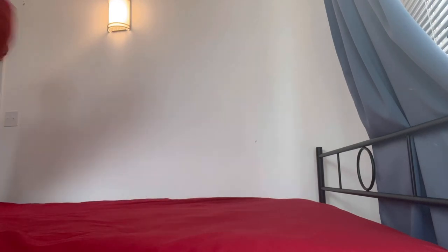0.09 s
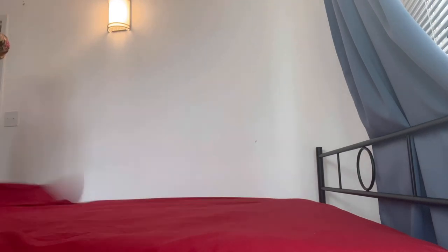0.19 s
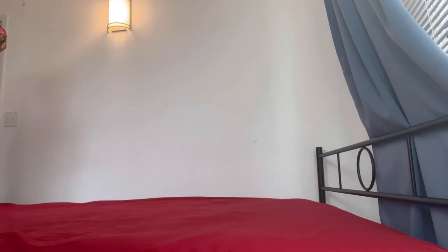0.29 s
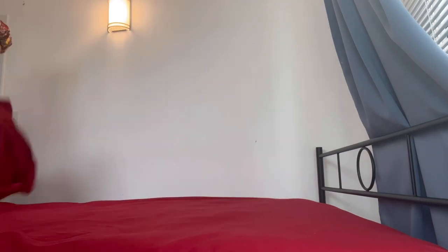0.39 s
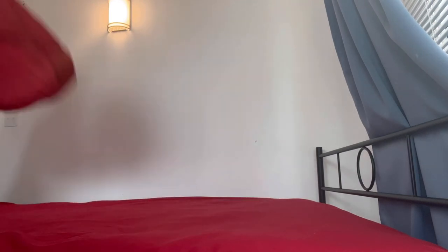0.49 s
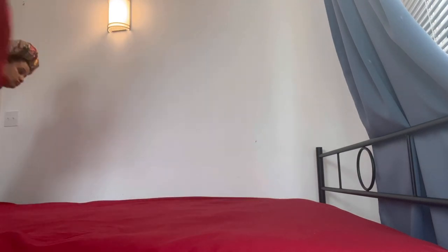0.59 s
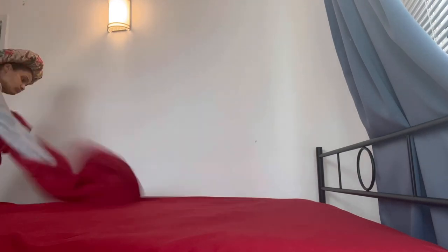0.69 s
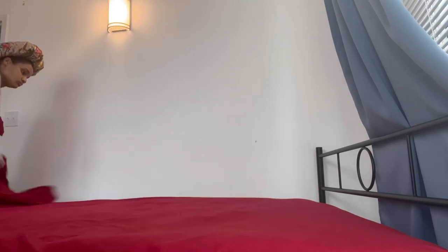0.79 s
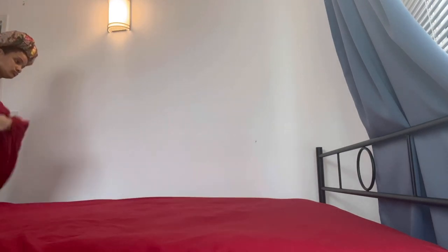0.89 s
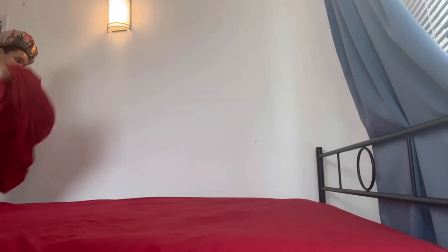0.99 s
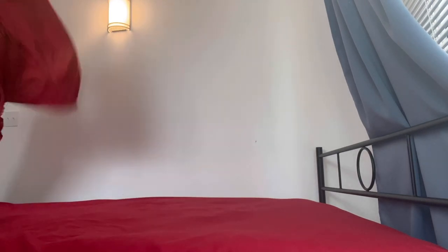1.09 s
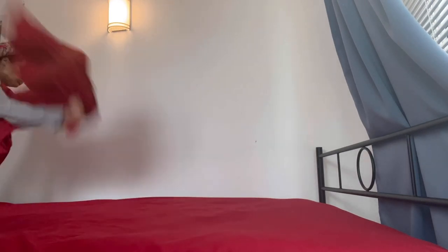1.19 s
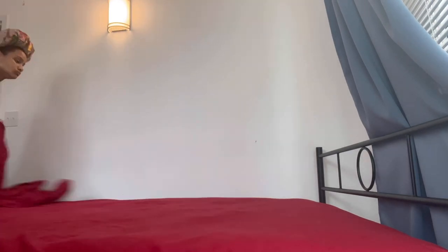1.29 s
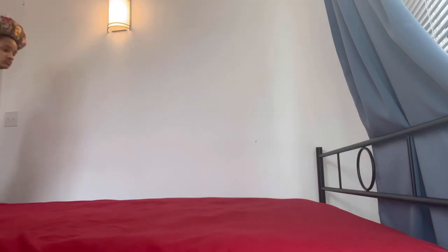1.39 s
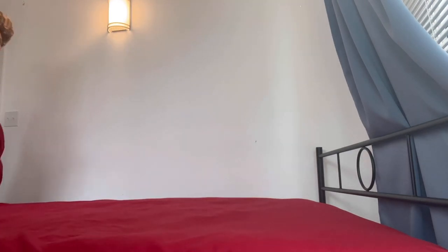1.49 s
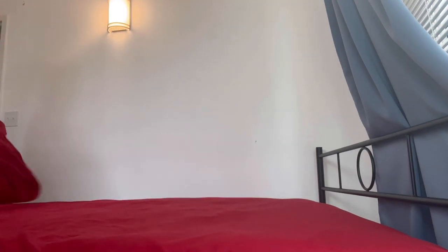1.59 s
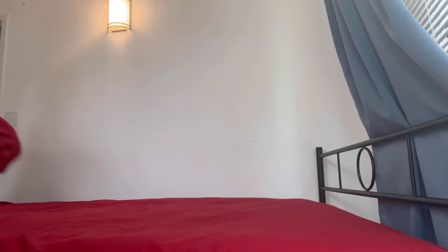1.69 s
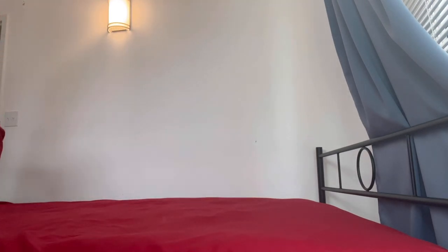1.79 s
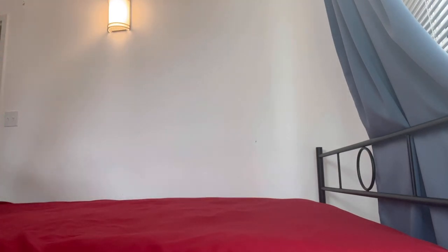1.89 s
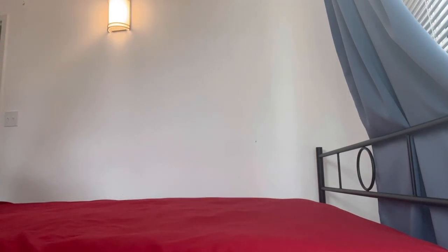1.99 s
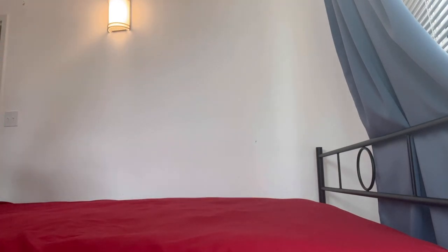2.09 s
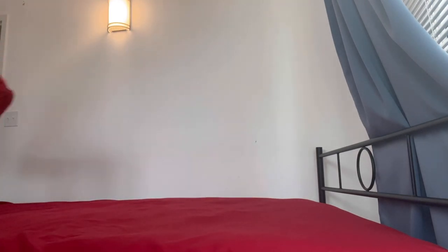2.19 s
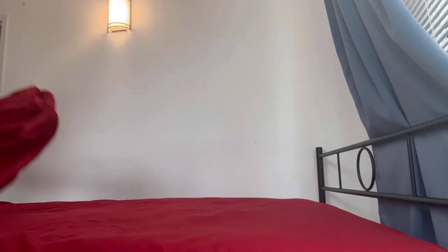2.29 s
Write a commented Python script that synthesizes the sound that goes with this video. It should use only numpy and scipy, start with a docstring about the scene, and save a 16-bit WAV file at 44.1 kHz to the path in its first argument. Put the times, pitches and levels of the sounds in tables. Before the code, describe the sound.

A cloth bed cover is shaken three times about half a second apart, each a sharp fabric snap with a low thump of air, soft swishes and pats between, close microphone in a small furnished bedroom.

```python
"""A low room hum and faint hiss run throughout, the hum growing after the last shake, with a soft noise rub.
In this small bedroom a cloth cover is shaken three times: noise whooshes, and volleys of snaps crack as it pulls taut.
Each shake shoves a thump of air at the listener: a pressure pulse with ringing room modes and a draught.
Noise swishes and pats fill the gaps; decaying sines flop before the third shake,
and bright noise ticks crinkle after it."""
import sys
import numpy as np
from scipy import signal
from scipy.fft import rfft, irfft, next_fast_len
from scipy.io import wavfile
from scipy.ndimage import map_coordinates

SR = 44100
rng = np.random.default_rng(int(sys.argv[2]) if len(sys.argv) > 2 else 0)


def inscribe(sig):
    """Save sig as 16-bit PCM at rate SR to the path in sys.argv[1].

    A 1-D sig is mono; a 2-D sig holds one channel per row.
    Samples are clipped to [-1, 1] before scaling.
    """
    pcm = np.round(np.clip(np.atleast_2d(sig).T, -1, 1) * 32767)
    wavfile.write(sys.argv[1], SR, pcm.astype(np.int16))


N = 101430

# All spectra are relative: the noise made from them is scaled to rms 1.
# Left-right correlation of all noise: pitch_hz, likeness (-1 to 1)
STEREO_LIKENESS = [(60, 0.98), (130, .88), (290, 0.42), (640, 0.06), (1400, -0.18), (3000, -0.011),
                   (7000, -0.17), (15000, 0.022)]

# Room air: pitch_hz, level_db (per Hz)
AIR_SPECTRUM = [(12, -26), (22, -5.5), (60, -0.5), (95, -6), (145, -14.5), (240, -17), (300, -21.5),
                (400, -23), (800, -39), (1390, -40.5), (2000, -38.5), (4000, -44.5), (9000, -57.5),
                (15700, -66)]
# Thin steady hiss: pitch_hz, level_db (per Hz)
FIZZ_SPECTRUM = [(8000, -16), (12500, -8), (13800, -6), (14200, 1), (14600, -7), (15800, -10)]
# Hum tones: pitch_hz, first_db (rms), later_db (rms), before the stereo lean
HUM_TONES = [(93, -60, -56), (178.2, -63.5, -57)]
AIR_DB, FIZZ_DB = -50.5, -80  # rms before the stereo lean
HUM_SWELL_START_S, HUM_SWELL_END_S = 1.33, 1.5

# Faint rub of the held cloth over time: start_s, level_db
RUB_LEVELS = [(0, -62.5), (.55, -72), (1.1, -67.5), (1.451, -83.5), (1.601, -91), (2.3, -82)]
# Tone of that rub: pitch_hz, level_db (per Hz)
RUB_SPECTRUM = [(500, 9.5), (2000, -3), (6000, -2.5), (10000, -10), (15000, -2)]
# Swishes of moving fabric:
# peak_s, rise_s, fall_s (bell widths), swoosh_db, centre_hz, hiss_db, treble_db (at 10 kHz and up)
SWISHES = [(.09, 0.034, 0.033, -50, 293, -57.5, 3), (.16, 0.023, 0.036, -50.5, 220, -67, -7),
           (.52, 0.041, 0.035, -48, 172, -69.5, 1), (0.658, .05, 0.13, -51.5, 258, -60.5, 1.5),
           (0.882, 0.028, 0.018, -38.5, 225, -52.5, -8), (0.943, 0.022, 0.039, -45, 137, -57, 6),
           (1.186, 0.025, 0.027, -41.5, 427, -59, 7), (1.225, 0.015, 0.025, -45.5, 376, -54.5, 4),
           (1.35, .03, 0.036, -54, 248, -58, 11.5), (1.418, 0.018, 0.042, -48.5, 312, -62, -7.5),
           (1.545, 0.026, 0.02, -58, 280, -65, -2), (1.80, 0.05, 0.038, -64, 297, -68, -8),
           (1.941, 0.059, 0.048, -57.5, 327, -66.5, -1.5), (2.039, 0.0092, 0.016, -73, 250, -64, -1.5),
           (2.28, 0.059, .035, -58.5, 170, -72.5, -18)]
# Low swoosh of pushed air: multiple of centre_hz (ratio), level_db
SWOOSH_SHAPE = [(.12, -14), (.4, -1), (1, -1), (1.7, -5.5), (3, -17), (6.5, -27.5), (17, -56)]
# Hiss of rubbing weave: pitch_hz, level_db (per Hz)
HISS_SPECTRUM = [(200, -3.5), (700, -9), (1500, 2.5), (3000, -4), (6000, -5), (10000, -14), (15000, -12.5)]

# Decay time of the room: pitch_hz, t60_s
ROOM_T60 = [(100, 0.39), (500, 0.32), (3000, .24), (14000, 0.4)]
ROOM_DB = -18.5  # gain into the room tail
WALLS_DB, WALL_SPAN_S = -11, 0.016  # early copies: level before their low cut, latest delay

# Shakes: crack_s, crack_db, flutter_s, treble_db (scaled by pitch in cracks),
# thump_db, thump_delay_s, suction_width_s, push_lag_s
SHAKES = [(0.22, -19.5, 0.018, 0.5, 4, 0.0066, 0.0023, -.0006),
          (.7355, -20.5, 0.018, -0.5, 1, .0045, 0.0019, .0008),
          (1.2798, -19.5, 0.0063, -5.5, -7, 0.00455, 0.0011, .002)]
# Cloth snapping taut: pitch_hz, level_db (per Hz)
CRACK_SPECTRUM = [(110, -47), (180, -10), (310, -6.5), (467, -10.5), (679, -15), (774, -13.5), (834, -13),
                  (1040, -18), (1210, -17.5), (1640, -13.5), (1940, -23), (2520, -20.5), (2810, -24.5),
                  (3270, -19.5), (3520, -32), (3730, -25.5), (4930, -30), (6410, -30), (7580, -35),
                  (12600, -42.5), (15700, -42.5)]
# Air round the cloth: pitch_hz, level_db (per Hz)
WHOOSH_SPECTRUM = [(60, -41), (130, 11), (400, 1), (800, -4), (2000, -20.5), (6000, -18.5), (15000, -38.5)]
CRACK_RISE_DB_PER_S, CRACK_FALL_DB_PER_S, CRACK_DROOP_DB_PER_S = 2014, 536, 111
WHOOSH_DB, WHOOSH_RISE_DB_PER_S, WHOOSH_FALL_DB_PER_S = -4, 798, 425  # level relative to crack_db
SNAPS_PER_S, SNAP_DB, SNAP_DECAY_S = 260, -1.5, 0.00069  # single folds within a crack
CLUMP_DB, CLUMP_KNOTS_PER_S = 1.76, 220  # the snaps bunch as the edge flutters

# Wall and room modes rung by each thump: pitch_hz, level_db (relative to thump_db), t60_s
ROOM_MODES = [(59, -28, 0.22), (91.1, -27.5, 0.23), (143.9, -22.5, .14), (231.3, -29.5, 0.2),
              (290.3, -35.5, 0.18)]
# Air that rolls on after the thump: pitch_hz, level_db (per Hz)
DRAUGHT_SPECTRUM = [(8, -44.5), (25, 2), (45, -6), (90, -21.5), (200, -21), (600, -71)]
PUSH_WIDTH_S = 0.0032  # the broad push of air round the sharp suction
DRAUGHT_DB, DRAUGHT_DELAY_S, DRAUGHT_WIDTH_S = -34, 0.035, 0.071
ECHO_S, ECHO_DB, ECHO_EDGE_HZ = 0.01414, -6, 450  # the far wall returns the bass

# Soft pats of hands and cloth: start_s, level_db, treble_edge_hz
PATS = [(0.462, -36, 2430), (.607, -46, 1480), (0.65, -40, 905), (.926, -38, 4500), (1.152, -51, 990),
        (1.267, -29.5, 1100), (1.408, -46.5, 700)]
# Tone of a pat before its treble edge: pitch_hz, level_db (per Hz)
PAT_SPECTRUM = [(40, 10), (200, -14.5), (400, 3), (800, -6.5), (1800, -12.5), (5000, -26), (15000, -24.5)]
PAT_RISE_DB_PER_S, PAT_FALL_DB_PER_S = 4000, 479

# Bumps as the hanging cloth flops down: start_s, level_db
FLOPS = [(.860, -35.5), (0.876, -35), (0.886, -32.5)]
# Tones in each bump: pitch_hz, level_db (relative to the bump)
FLOP_MODES = [(240, -0.5), (530, -10)]
FLOP_FALL_DB_PER_S = 750

# Crinkles of the settling cloth: start_s, level_db
CRINKLES = [(1.351, -49.5), (1.363, -50.5), (1.375, -50.5)]
# Tone of a crinkle: pitch_hz, level_db (per Hz)
CRINKLE_SPECTRUM = [(1000, -25), (5000, -8.5), (9000, -13), (14000, -5)]
CRINKLE_FALL_DB_PER_S = 2196

# Left gain; the right gets the opposite. The background lean is scaled by pitch.
THUMP_PAN_DB, CLOTH_PAN_DB, BACKGROUND_PAN_DB = -2.05, -0.22, -2.5
TOP_HZ = 15900


def amp(db):
    """Decibels to gain."""
    return 10 ** (np.asarray(db) / 20)


def unit(x):
    """Scaled to rms 1."""
    return x / np.sqrt(np.mean(x ** 2) + 1e-20)


def clock():
    """Time of each sample in seconds."""
    return np.arange(N) / SR


def along(points, hz):
    """Reads a curve of (Hz, value) points on a log frequency axis."""
    f, v = np.transpose(points)
    return np.interp(np.log(hz + 1), np.log(f + 1), v)


def wobble(rate):
    """A smooth random curve with rate knots a second."""
    knots = rng.standard_normal(8192)
    return map_coordinates(knots, [clock() * rate], mode="wrap")


def filtered(x, response):
    """Shapes x by a response over frequency."""
    size = next_fast_len(N + SR // 2)
    hz = np.fft.rfftfreq(size, 1 / SR)
    return irfft(rfft(x, size) * response(hz), size)[..., :N]


def rush(spectrum, grain_db=0, grain_rate=500):
    """Stereo noise of rms 1; grain breaks it into tiny spurts, as folds slip and snap."""
    pair = rng.standard_normal((2, N)) * amp(grain_db * wobble(grain_rate))

    def mid_side_gains(hz):
        """The mid-side balance sets the left-right correlation."""
        turn = np.arccos(np.clip(along(STEREO_LIKENESS, hz), -1, 1)) / 2
        return amp(along(spectrum, hz)) * [np.cos(turn), np.sin(turn)]

    mid, side = filtered(pair, mid_side_gains)
    return unit(np.array([mid + side, mid - side]))


def burst(s, rise, fall, hold=0, droop=0):
    """Attack up to s, drooping hold and release, with slopes in dB a second."""
    t = clock() - s
    attack_db = rise * np.minimum(t, 0)
    droop_db = droop * np.clip(t, 0, hold)
    release_db = fall * np.maximum(t - hold, 0)
    return amp(attack_db - droop_db - release_db)


def swell(s, rise, fall):
    """A rounded bell that peaks at s, with its widths in seconds."""
    t = clock() - s
    return np.exp(-0.5 * (t / np.where(t < 0, rise, fall)) ** 2)


def panned(x, db):
    """Left raised and right lowered by db."""
    return x * amp([[db], [-db]])


def background():
    """Room air, thin hiss and an unsteady hum that grows once the shaking stops; the bass leans right."""
    floor = amp(AIR_DB) * rush(AIR_SPECTRUM) + amp(FIZZ_DB) * rush(FIZZ_SPECTRUM)
    for hz, first_db, later_db in HUM_TONES:
        level_db = np.interp(clock(), (HUM_SWELL_START_S, HUM_SWELL_END_S), (first_db, later_db))
        phase = 2 * np.pi * hz * clock() + 0.43 * wobble(5.7)
        floor = floor + amp(level_db) * np.sqrt(2) * np.sin(phase)

    def lean(hz):
        """Opposite gains left and right, strongest in the bass."""
        pan_db = BACKGROUND_PAN_DB * along([(200, 0.97), (600, 0.14)], hz)
        return amp(np.outer([1, -1], pan_db))

    return filtered(floor, lean)


def swishes():
    """Gathered and lifted cloth: a low swoosh under the grainy hiss of rubbing weave, over a faint rub."""
    air = rush([(20, 0), (15000, 0.0077)], grain_db=2.5, grain_rate=90)
    weave = rush(HISS_SPECTRUM, grain_db=1.0, grain_rate=480) * amp(2.1 * wobble(70))
    rub_db = np.interp(clock(), *np.transpose(RUB_LEVELS))
    out = amp(rub_db) * rush(RUB_SPECTRUM, grain_db=1)
    for s, rise, fall, swoosh_db, centre_hz, hiss_db, treble_db in SWISHES:
        swoosh_spectrum = np.multiply(SWOOSH_SHAPE, (centre_hz, 1))
        swoosh = filtered(air, lambda hz: amp(along(swoosh_spectrum, hz)))
        hiss = filtered(weave, lambda hz: amp(treble_db * along([(2000, 0), (10000, 1)], hz)))
        layers = amp(swoosh_db) * unit(swoosh) + amp(hiss_db) * unit(hiss)
        out += swell(s, rise, fall) * layers
    return out


def room(x):
    """The short tail of a furnished room: noise that decays at its own pace in each band."""
    hz, t, z = signal.stft(rng.standard_normal((2, SR // 2)), SR, nperseg=256)
    decay = np.exp(-np.log(1000) * t / along(ROOM_T60, hz)[:, None])
    tail = signal.istft(z * decay, SR, nperseg=256)[1]
    return signal.fftconvolve(x, tail / np.linalg.norm(tail[0]), axes=1)[:, :N]


def walls(x, count=8):
    """Near walls add a few quick copies, different in each channel, with their bass cut."""
    answer = np.zeros((2, SR // 10))
    for side in answer:
        delays = (rng.uniform(0.1, 1, count) * WALL_SPAN_S * SR).astype(int)
        signs = rng.choice([-1, 1], count)
        np.add.at(side, delays, signs * amp(WALLS_DB) / np.sqrt(count))
    copies = signal.fftconvolve(x, answer, axes=1)[:, :N]
    echo = filtered(copies, lambda hz: hz ** 2 / (hz ** 2 + 250 ** 2))
    return (x + echo) / np.hypot(1, amp(WALLS_DB))


def cracks():
    """Each shake whooshes and fires a volley of snaps as the cloth pulls taut and flutters out."""
    out = np.zeros((2, N))
    for s, db, flutter, treble_db, *_ in SHAKES:
        # Random clicks, each with a short decay, lift the noise like single folds
        clicks = rng.random(N) < SNAPS_PER_S / SR
        folds = signal.lfilter([1], [1, -np.exp(-1 / (SNAP_DECAY_S * SR))], clicks)
        grain = rush([(100, 0), (15000, 0)], grain_db=1.5, grain_rate=700)
        snaps = grain * (1 + amp(SNAP_DB) * folds)

        def colour(hz):
            """Crack tone with this shake's treble tilt."""
            tilt_db = along([(1000, 0.068), (8000, 0.84)], hz) * treble_db
            return amp(along(CRACK_SPECTRUM, hz) + tilt_db)

        clumps = amp(CLUMP_DB * wobble(CLUMP_KNOTS_PER_S))
        envelope = burst(s, CRACK_RISE_DB_PER_S, CRACK_FALL_DB_PER_S, flutter, CRACK_DROOP_DB_PER_S)
        crack = unit(filtered(snaps, colour)) * clumps * envelope
        whoosh_envelope = burst(s + flutter / 2, WHOOSH_RISE_DB_PER_S, WHOOSH_FALL_DB_PER_S)
        whoosh = rush(WHOOSH_SPECTRUM) * whoosh_envelope
        out += amp(db) * walls(crack + amp(WHOOSH_DB) * whoosh)
    return out


def thumps():
    """The reversing sheet sucks sharply inside a broad push; modes ring and a draught follows."""
    pulses, ring, draught = np.zeros((3, N))
    for s, _, _, _, db, delay, width, lag in SHAKES:
        at = s + delay
        # The width ratio gives push and suction equal area
        push = width / PUSH_WIDTH_S * swell(at + lag, PUSH_WIDTH_S, PUSH_WIDTH_S)
        suction = swell(at, width, width)
        pulses += amp(db) * (push - suction)
        t = np.maximum(clock() - at, 0)
        for hz, level_db, t60 in ROOM_MODES:
            decay = np.exp(-np.log(1000) * t / t60)
            ring += amp(db + level_db) * np.sin(2 * np.pi * hz * t) * decay
        draught += swell(s + DRAUGHT_DELAY_S, DRAUGHT_DELAY_S / 2, DRAUGHT_WIDTH_S)

    def far_wall(hz):
        """Direct pulse plus one delayed, dulled return."""
        delayed = np.exp(-2j * np.pi * hz * ECHO_S)
        return 1 + amp(ECHO_DB) * delayed / np.hypot(1, hz / ECHO_EDGE_HZ)

    return filtered(pulses, far_wall) + ring + amp(DRAUGHT_DB) * draught * rush(DRAUGHT_SPECTRUM)


def pats():
    """Dull, short contacts of hands and folds: noise bursts with the treble rolled off."""
    out = np.zeros((2, N))
    for s, db, edge_hz in PATS:
        noise = rush(PAT_SPECTRUM, grain_db=2)
        dull = unit(filtered(noise, lambda hz: 1 / np.hypot(1, (hz / edge_hz) ** 2)))
        out += amp(db) * burst(s, PAT_RISE_DB_PER_S, PAT_FALL_DB_PER_S) * dull
    return out


def flops():
    """Slack folds drop with short, dull bumps of decaying sines."""
    out = np.zeros(N)
    for s, db in FLOPS:
        envelope = burst(s, PAT_RISE_DB_PER_S, FLOP_FALL_DB_PER_S)
        for hz, level_db in FLOP_MODES:
            out += amp(db + level_db) * envelope * np.sin(2 * np.pi * hz * (clock() - s))
    return out


def crinkles():
    """Small bright ticks of noise as creases let go."""
    ticks = np.zeros(N)
    for s, db in CRINKLES:
        ticks += amp(db) * burst(s, 2 * CRINKLE_FALL_DB_PER_S, CRINKLE_FALL_DB_PER_S)
    return rush(CRINKLE_SPECTRUM) * ticks


def scene():
    """Cloth with its room tail, moved air and the bedroom background."""
    cloth = swishes() + cracks() + pats() + flops() + crinkles()
    cloth_in_room = cloth + amp(ROOM_DB) * room(cloth)
    return background() + panned(cloth_in_room, CLOTH_PAN_DB) + panned(thumps(), THUMP_PAN_DB)


def record(dry):
    """Nothing is kept above the band limit."""
    return filtered(dry, lambda hz: hz < TOP_HZ)


dry = scene()
out = record(dry)
inscribe(out)
```